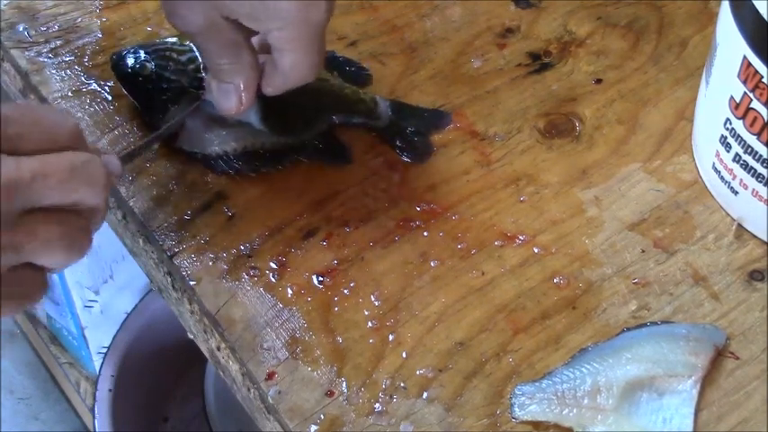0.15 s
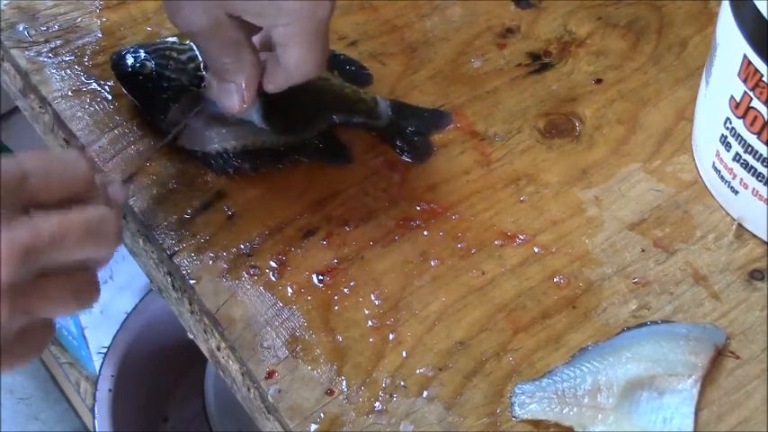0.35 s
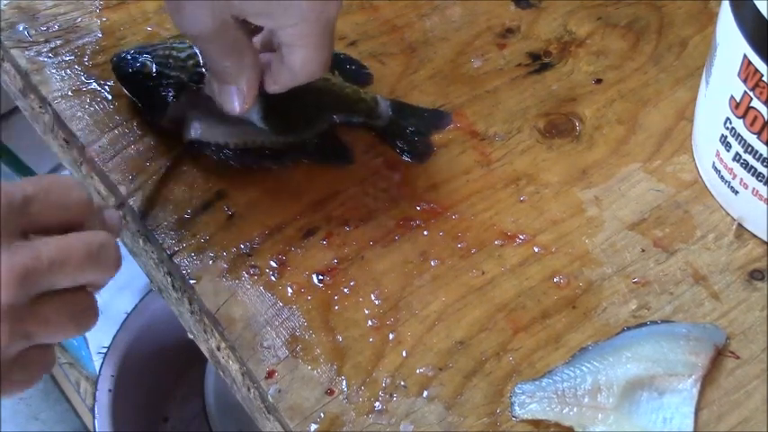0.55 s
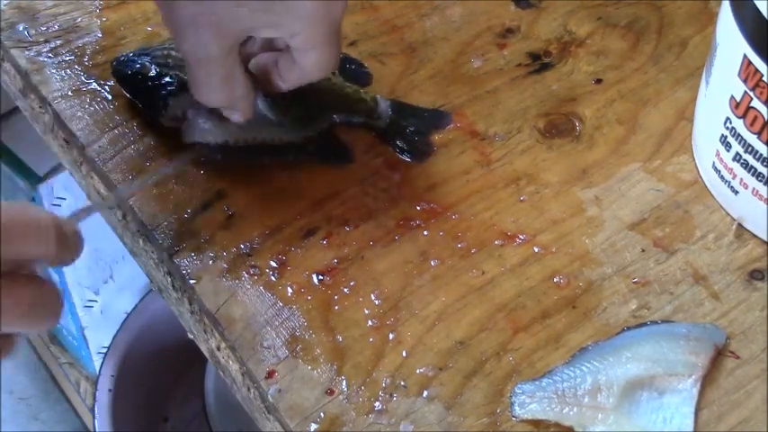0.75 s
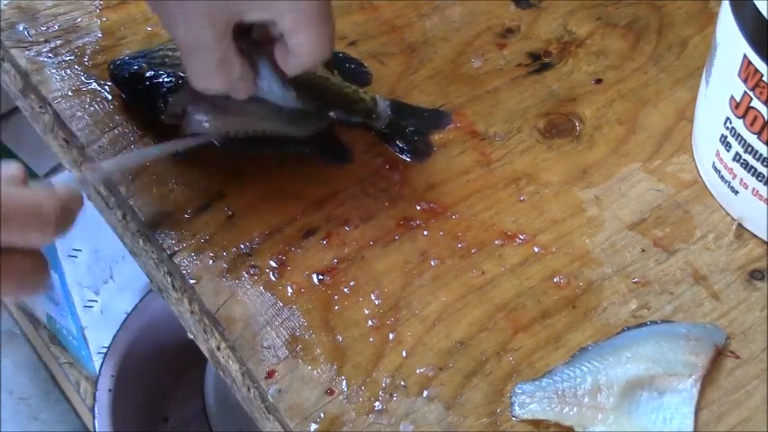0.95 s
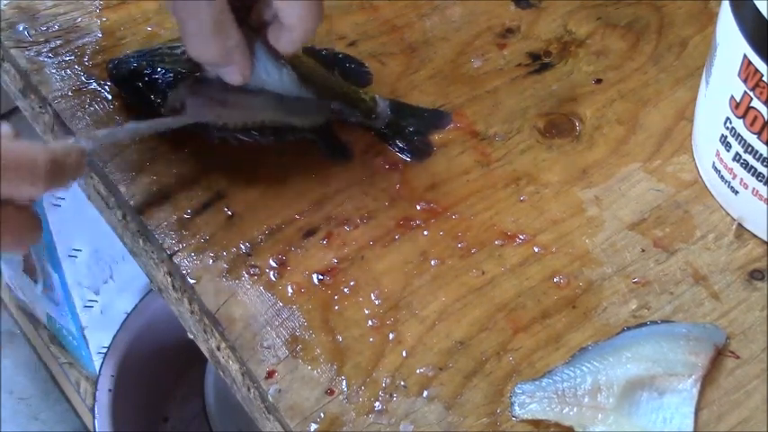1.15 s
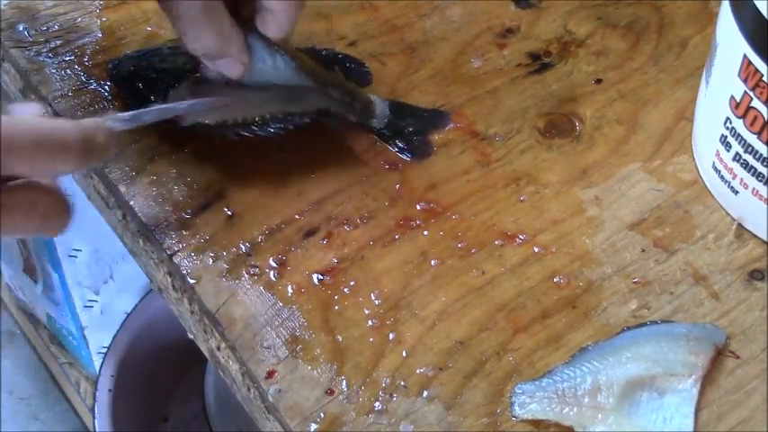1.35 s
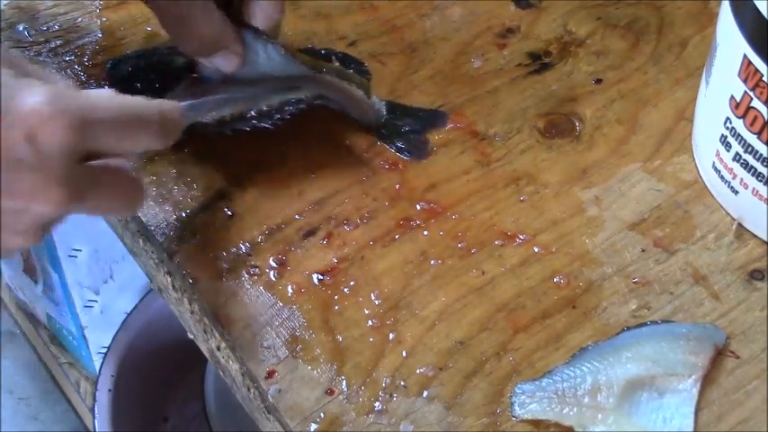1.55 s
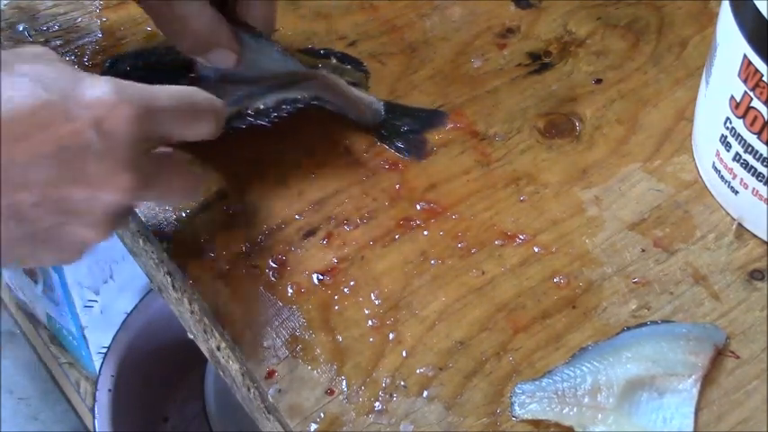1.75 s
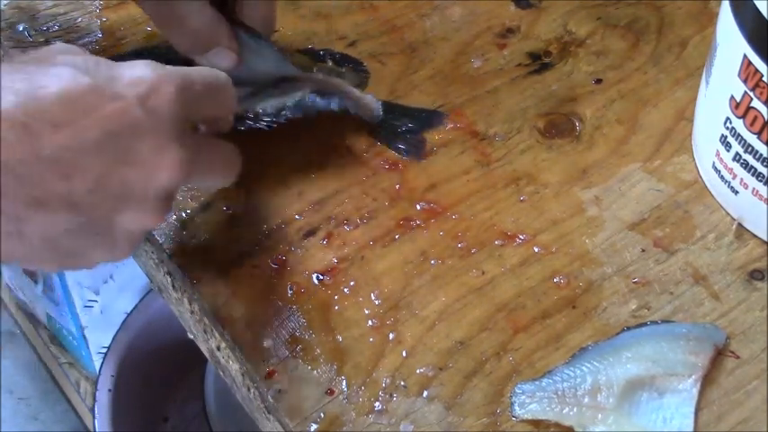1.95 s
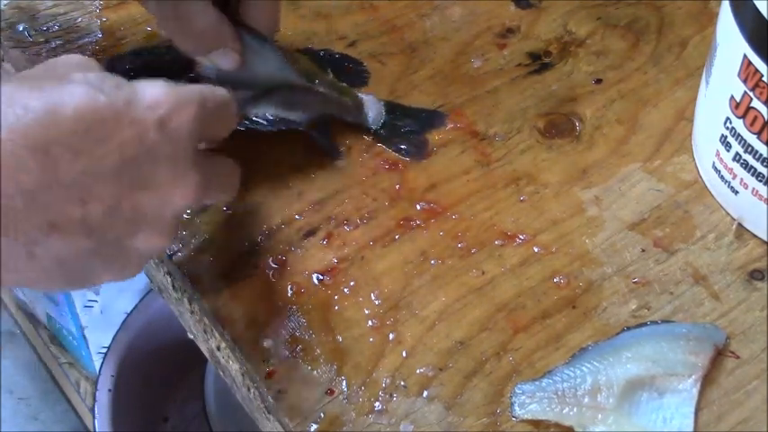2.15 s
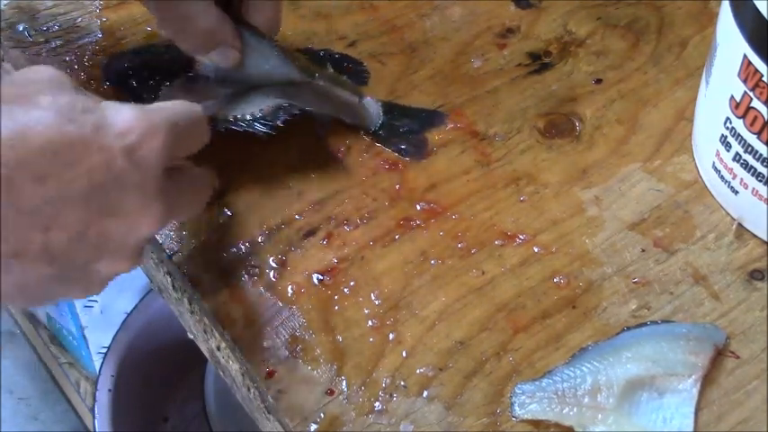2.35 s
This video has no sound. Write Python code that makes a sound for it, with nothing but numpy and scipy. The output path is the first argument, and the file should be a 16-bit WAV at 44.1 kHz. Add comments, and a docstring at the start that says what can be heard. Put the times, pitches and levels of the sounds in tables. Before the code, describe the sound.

A knife fillets a small fish on a wet wooden board, with one sharp knock and wet clicks

```python
"""A knife fillets a small fish on a wet wooden board, heard close by in a quiet room with a faint hum.
The blade's touch, blow and bounces excite damped modes of wood and steel; the board thuds on its support.
Flesh drags and rasps as resonance-filtered noise; clicks, pops and crackle are short filtered impulses.
A squeak, a hollow sliding hiss and a faint, thin high tone join in; hits and clicks feed a short reverberation."""
import sys
import numpy as np
from scipy import signal
from scipy.fft import rfft, irfft
from scipy.io import wavfile
from scipy.ndimage import uniform_filter1d

SR = 44100
rng = np.random.default_rng(int(sys.argv[2]) if len(sys.argv) > 2 else 0)


def bounce(signal):
    """Save signal as a 16-bit WAV file at the path given by the first command-line argument."""
    frames = np.transpose(np.atleast_2d(signal))
    limited = np.clip(frames, -1, 1)
    pcm = np.round(limited * 32767).astype(np.int16)
    wavfile.write(sys.argv[1], SR, pcm)


N = 105840
TIME = np.arange(N) / SR
RING_TIME = np.arange(SR // 2) / SR

# hands and fish rubbing on the board: (time [s], rumble level [dB], hiss level [dB], fizz level [dB])
DRAG_LEVELS = [(0.0, -87, -89, -66), (0.26, -53, -72, -87), (0.39, -52.5, -59.5, -64.5),
               (0.52, -49, -55.5, -71), (0.58, -52.5, -58.5, -65.5), (0.88, -56.5, -64.5, -68),
               (1.02, -58, -71.5, -69.5), (1.16, -67.5, -101, -68.5), (1.35, -57.5, -72.5, -72),
               (1.48, -96, -87, -84), (1.69, -61, -69.5, -78), (1.94, -60, -65, -71),
               (2.09, -57.5, -66.5, -67.5), (2.27, -66, -67, -66), (2.4, -61.5, -76, -80)]
# blade against the board, a touch, the blow and its bounces; wood and steel levels are trimmed in blows():
# (time [s], wood level [dB], steel level [dB], snap pitch [Hz], snap level [dB])
BLADE_BLOWS = [(0.3886, -26, -18.5, 1870, -21.5), (0.3959, -24.5, -4, 6480, -22),
               (0.3977, -9.5, -13.5, 3160, -12.5), (0.4035, -18, -45, 3340, -25.5),
               (.418, -29, -63, 3470, -32), (0.455, -40, -52, 2930, -49), (0.488, -46, -35, 3000, -50)]
WOOD_RISE_S = 0.00071


def amp(db):
    """Level to amplitude: 20 dB is a factor of ten."""
    return 10 ** (np.asarray(db) / 20)


def evened(x):
    """Normalisation to unit rms."""
    return x / np.sqrt(np.mean(x ** 2) + 1e-20)


def read(points, hz):
    """Interpolation of a spectral table along logarithmic frequency."""
    f, value = np.transpose(points)
    return np.interp(np.log(hz + 1), np.log(f + 1), value)


def curve(table, col):
    """Amplitude envelope, linear in dB between the table's times."""
    rows = np.array(table)
    return amp(np.interp(TIME, rows[:, 0], rows[:, col]))


def within(table):
    """Gate open between the table's first and last times."""
    return (TIME > table[0][0]) * (TIME < table[-1][0])


def add(mix, s, sound):
    """Superposition of a sound onto the mix from time s, cut at the end."""
    part = mix[..., round(s * SR):][..., :sound.shape[-1]]
    part += sound[..., :part.shape[-1]]


def pair(same, length=N):
    """Partly correlated noise: the second channel mixes the first with independent noise."""
    a, b = rng.standard_normal((2, length))
    same = np.clip(same, 0, 1)
    return np.array([a, same * a + np.sqrt(1 - same ** 2) * b])


def wobble(seconds, size):
    """Low-pass random fluctuation of unit rms, from two running means."""
    span = max(round(seconds * SR), 2)
    once = uniform_filter1d(rng.standard_normal(size), span)
    return evened(uniform_filter1d(once, span))


def resonate(x, hz, width):
    """Resonance of about unit gain: shift to 0 Hz, two equal one-pole low-passes, shift back."""
    turn = np.exp(2j * np.pi * hz * np.arange(x.shape[-1]) / SR)
    r = np.exp(-np.pi * width / SR)
    low = signal.lfilter([(1 - r) ** 2], [1, -2 * r, r * r], x / turn)
    return 2 * (turn * low).real


def resonances(x, bands):
    """Parallel resonances, each brought to its own rms level."""
    return sum(amp(db) * evened(resonate(x, hz, width)) for hz, width, db in bands)


def ring(modes, rise_s):
    """Modal vibration of a struck body: exponentially damped sines behind a smooth onset."""
    t = RING_TIME
    tones = sum(amp(db - 60 * t / t60) * np.sin(2 * np.pi * hz * t) for hz, db, t60 in modes)
    return (1 - np.exp(-t / rise_s)) * tones


def chatter():
    """Amplitude modulation of a loose board: steady at first, uneven within 7 ms."""
    depth, change_s = 0.35, 0.006
    onset = np.minimum(RING_TIME / 0.0069, 1)
    return 1 + depth * onset * wobble(change_s, size=len(RING_TIME))


def puff(seconds, same):
    """Impulsive contact: a sharp edge and exponentially dying noise, unit energy per channel."""
    x = pair(same, 600) * np.exp(-np.arange(600) / SR / seconds)
    x[:, 0] = 0.75 * np.sqrt(seconds * SR)  # sharp edge
    return x / np.linalg.norm(x, axis=1)[:, None]


def burst(hz, seconds, width, same):
    """Resonant response to an impulsive contact, unit peak; width is a fraction of the pitch."""
    narrow = resonate(puff(seconds, same), hz, width * hz)
    x = resonate(narrow, hz, 2 * width * hz)
    return x / abs(x).max()


def click_burst(hz):
    """Brief broadband impulse around a pitch, unit peak."""
    return burst(hz, 0.00023, 1, 0.68)


def room(x):
    """Reverberation: convolution with dense reflections whose decay time depends on frequency."""
    # (frequency [Hz], t60 [s])
    decay_times = [(130, 0.06), (260, 0.26), (700, 0.31), (1840, 0.2), (4850, 0.17), (12800, 0.078)]
    delayed = np.arange(SR // 2) > 150  # samples before the first reflection
    taps = pair(0.95, SR // 2) * delayed
    hz, t, z = signal.stft(taps, SR, nperseg=256)
    decay = amp(-60 * t / read(decay_times, hz)[:, None])
    tail = signal.istft(z * decay, SR, nperseg=256)[1]
    return signal.fftconvolve(x * np.ones((2, 1)), tail / np.linalg.norm(tail[0]), axes=1)[:, :N]


def air():
    """Stationary noise of room and microphone, with frequency-dependent correlation of the channels."""
    # noise spectrum: (frequency [Hz], relative spectral level [dB])
    air_spectrum = [(25, -4), (60, -7.5), (100, -7), (240, -7.5), (400, -11.5), (700, -17), (2500, -27),
                    (6000, -33.5), (12200, -39), (16500, -45)]
    # left-right likeness: (frequency [Hz], correlation [-1 to 1])
    likeness = [(60, -0.21), (240, -0.081), (950, -0.38), (3770, 0.13), (15000, 0.25)]
    level_db = -56.5  # rms
    hz, (a, b) = np.fft.rfftfreq(N, 1 / SR), rfft(rng.standard_normal((2, N)))
    same = np.clip(read(likeness, hz), -1, 1)
    stereo = np.array([a, same * a + np.sqrt(1 - same ** 2) * b])
    return amp(level_db) * evened(irfft(stereo * amp(read(air_spectrum, hz)), N))


def hum():
    """Steady tones: sines of constant amplitude and random starting phase."""
    # (frequency [Hz], level [dB] before a 1.5 dB lift)
    hum_tones = [(89, -79), (240, -63)]
    return sum(amp(db + 1.5) * np.sin(2 * np.pi * (hz * TIME + rng.random())) for hz, db in hum_tones)


def rattle():
    """Noise-excited resonances of loose things, decaying exponentially after the main blow."""
    # (frequency [Hz], width [Hz], relative level [dB])
    rattle_bands = [(616, 830, -0.5), (1240, 1600, -1), (3230, 340, -22.5), (5400, 1300, -4),
                    (11060, 2000, -22)]
    level_db, t60_s = -31.5, 0.22
    t = TIME - BLADE_BLOWS[2][0]
    noise = evened(resonances(pair(0.94), rattle_bands))
    return noise * (t > 0) * amp(level_db - 60 * np.maximum(t, 0) / t60_s)


def nudges():
    """Low tones under half-sine envelopes: soft swells as the hands press the board."""
    # (time [s], peak level [dB], pitch [Hz], length [s])
    nudge_events = [(.725, -53, 281.4, 0.046), (0.952, -51.5, 284, 0.049), (1.073, -46, 297, 0.033),
                    (1.107, -53, 259, 0.034), (1.2, -51.5, 271, 0.049), (1.963, -49, 298, 0.04)]
    out = np.zeros((2, N))
    for s, db, hz, length in nudge_events:
        t = np.arange(0, length, 1 / SR)
        tone = np.sin(2 * np.pi * (hz * t + rng.random()))
        swell = np.sin(np.pi * t / length)
        add(out, s, amp(db) * (swell * tone)[None])
    return out


def drag():
    """Friction noise through resonances: lumpy low rumble of the board, hiss of wet skin, fizz on top."""
    # board: (frequency [Hz], width [Hz], relative level [dB])
    rumble_bands = [(132, 90, -5.5), (197.4, 19.6, -6.5), (263.8, 43.5, -0.5), (301.6, 21, -0.5),
                    (365.3, 36, -5), (477, 36.5, -8.5), (760, 580, -14.5)]
    # wet skin: (frequency [Hz], width [Hz], relative level [dB])
    hiss_bands = [(995, 660, 8.5), (1384, 62, 2), (1820, 440, -0.5), (2367, 1200, 5.5), (3050, 3600, 7)]
    lumps = amp(2.5 * wobble(500 / SR, size=N))  # 2.5 dB rms
    rumble = resonances(pair(0.73) * lumps, rumble_bands)
    hiss = resonances(pair(0.46), hiss_bands)
    fizz = resonate(pair(0.12), 8250, 18000)
    layers = [rumble, hiss, fizz]
    return sum(evened(x) * curve(DRAG_LEVELS, k + 1) for k, x in enumerate(layers))


def slide():
    """Narrow-band noise from one resonance: the hollow hiss as the fish slides."""
    # (time [s], level [dB])
    slide_levels = [(0.45, -54), (0.518, -74), (0.698, -68), (0.71, -62), (0.768, -74.5), (1.05, -74)]
    hiss = evened(resonate(pair(0.86), 2560, 250))
    return hiss * curve(slide_levels, 1) * within(slide_levels)


def thin_band():
    """Very narrow-band noise near 5.5 kHz, switched on and off: a faint, thin high tone."""
    # (time [s], length [s], level [dB])
    thin_band_events = [(0.054, 0.09, -76), (0.212, 0.067, -73), (.5, 0.29, -77), (.82, 0.068, -73),
                        (0.945, 0.063, -74.5)]
    gate = sum(amp(db) * (TIME > s) * (TIME < s + length) for s, length, db in thin_band_events)
    tone = evened(resonate(pair(0.44), 5500, 30))
    return tone * uniform_filter1d(gate, 300)


def squeak():
    """Frequency-wandering tone amid narrow-band noise: a rough squeak with a wider skirt."""
    # (time [s], level [dB])
    squeak_levels = [(2.02, -83), (2.042, -80), (2.072, -61), (2.094, -74), (2.17, -74), (2.2, -61),
                     (2.224, -69), (2.248, -54), (2.285, -83), (2.332, -69), (2.37, -81)]
    pitch_hz, wander_hz = 4270, 50
    rub = pair(0.92)
    phase = 2 * np.pi * np.cumsum(pitch_hz + wander_hz * wobble(0.023, size=N)) / SR
    line = amp(-4) * np.sqrt(2) * np.sin(phase)
    core = evened(resonate(rub, pitch_hz, 150))
    skirt = amp(2) * evened(resonate(rub, pitch_hz, 800))
    return evened(core + skirt + line) * curve(squeak_levels, 1) * within(squeak_levels)


def rasps():
    """Amplitude-modulated friction noise: grainy rasps of the blade through flesh, swelling fast."""
    # (time [s], length [s], level [dB], pitch [Hz])
    rasp_events = [(0.344, 0.02, -52.5, 2000), (.345, 0.027, -53.5, 10100), (1.106, 0.039, -59, 3120),
                   (1.682, 0.042, -64, 1870), (1.804, 0.0074, -60, 1000), (1.818, 0.031, -67, 3650),
                   (1.904, 0.19, -73, 3520), (1.966, 0.059, -58.5, 1190), (2.05, 0.12, -63.5, 3030),
                   (2.193, 0.037, -63, 2180), (2.23, 0.035, -60, 1660)]
    out = np.zeros((2, N))
    grains = pair(0.84) * amp(1.5 * wobble(60 / SR, size=N))  # 1.5 dB rms
    for s, length, db, hz in rasp_events:
        u = np.arange(0, 1, 1 / (length * SR))
        piece = grains[:, round(s * SR):][:, :len(u)]
        swell = np.sin(np.pi * np.sqrt(u))
        add(out, s, amp(db) * swell * evened(resonate(piece, hz, hz)))
    return out


def crackle():
    """Random impulse train whose density follows the fizz of the drag: faint crackle in four pitches."""
    mean_per_s, level_db = 110, -58.5
    fizz = curve(DRAG_LEVELS, 3)
    busy = fizz / fizz.mean()
    size = amp(3.8 * np.minimum(rng.exponential(1, (4, N)), 3))
    train = (rng.random((4, N)) < mean_per_s / 4 / SR * busy) * size
    out = np.zeros((2, N))
    for row, hz in zip(train, (3380, 7000, 9630, 11840)):
        out += amp(level_db) * signal.oaconvolve(row[None], click_burst(hz), axes=1)[:, :N]
    return out


def pops():
    """Impulses through narrower resonances, alike in both channels: duller pops."""
    # (time [s], peak level [dB], pitch [Hz])
    pop_events = [(0.347, -55, 800), (1.105, -55, 3160), (1.295, -49.5, 4030), (1.801, -48.5, 2550),
                  (1.972, -56.5, 1150), (1.983, -52, 810), (2.064, -52, 2980), (2.196, -59, 1830), ]
    out = np.zeros((2, N))
    for s, db, hz in pop_events:
        add(out, s, amp(db) * burst(hz, 0.0027, 0.27, 1.0))
    return out


def clicks():
    """Sudden release of scales, bones and skin: a bright impulse, lower part, wide edge and wet after-sound."""
    # (time [s], bright part level [dB], pitch [Hz], low part level [dB] before a 1.5 dB cut,
    #  left minus right [dB])
    click_events = [(0.056, -49.5, 8400, -73, 1.0), (0.0686, -53, 6100, -81, 0.5),
                    (0.1621, -45.5, 9000, -61, 4), (0.3476, -35, 10360, -48, 3),
                    (0.6724, -54.5, 8900, -67, 7), (0.6794, -58, 5600, -68, 6), (0.708, -49, 9800, -51, 10),
                    (0.7259, -47, 10900, -61, 0), (0.753, -48, 8600, -66, 7), (0.7936, -51.5, 8700, -64, 5),
                    (0.907, -43, 12200, -45.5, 1.0), (0.9367, -57, 7100, -58, 0.5),
                    (0.947, -49.5, 9800, -63, 4), (0.955, -56, 5630, -55, -1), (0.9875, -54, 6900, -55, 6),
                    (0.996, -52, 6900, -51, 1), (1.0568, -56, 6200, -44, -2), (1.061, -52, 6650, -44.5, 3),
                    (1.0699, -49, 10600, -61, 3), (1.0824, -55, 5900, -68, 0.5),
                    (1.092, -47, 11800, -70, 0), (1.1118, -46.5, 7250, -49, 0),
                    (1.1188, -38.5, 10500, -46, 3), (1.1594, -45, 7450, -56, 1.5),
                    (1.1835, -42.5, 10800, -74, 4), (1.1983, -30.5, 11000, -34.5, 0),
                    (1.2245, -43.5, 11700, -77, 0), (1.3483, -50, 8500, -63, 5),
                    (1.6494, -52, 9900, -53, 4), (1.8032, -34, 10730, -46.5, 3.0),
                    (1.9345, -47.5, 5950, -52, 1), (1.9843, -38, 11900, -42.5, 0),
                    (1.998, -46.5, 9500, -63, 3), (2.067, -47, 7700, -60, -2),
                    (2.0764, -35.5, 9270, -57, 2), (2.196, -44, 10300, -55.5, 1.0),
                    (2.2323, -46, 10400, -69, 3), (2.243, -48.5, 7100, -56, -0.5), ]
    out = np.zeros((2, N))
    for s, db, hz, low_db, pan_db in click_events:
        bright = amp(db) * click_burst(hz)
        low = amp(low_db - 1.5) * burst(3830, 0.00037, 0.61, 0.76)
        edge = amp(db + 1.5) * burst(7040, 0.000115, 1.78, 0.88)
        after = amp(db - 3.5) * burst(hz, 0.0064, 0.35, 0.58)
        add(out, s, (bright + low + edge + after) * amp([[pan_db / 2], [-pan_db / 2]]))
    return out


def thuds():
    """Damped modes of the board rocking on its support; the hands stop the low ring early."""
    # (time [s], level [dB], brightness relative to it [dB], low ring before stopping [s])
    thud_events = [(0.214, -33, -7, 0.028), (0.247, -43, -18, 0.022), (0.281, -41.5, -18, 0.012),
                   (0.298, -38.5, -24, 0.03), (.345, -35.5, -18, 0.03), (.395, -36.5, -29, 0.018),
                   (0.452, -37.5, -24, 0.017)]
    # low modes on the support: (frequency [Hz], relative level [dB], t60 [s])
    support_modes = [(56.8, -11.5, .3), (134.6, 4, 0.17), (181, -10, 0.7)]
    # upper modes: (frequency [Hz], relative level [dB], t60 [s])
    top_modes = [(328, -3.5, 0.206), (457, 1.5, 0.066), (515.3, -2, 0.26), (625, -5.5, 0.15),
                 (793, -3.5, 0.077), (862, 5, 0.022), (1148, -6.5, 0.082)]
    out = np.zeros((2, N))
    for s, db, top_db, length in thud_events:
        stop = np.exp(-np.maximum(RING_TIME - length, 0) / 0.005)
        low = stop * ring(support_modes, 0.0015)
        top = amp(top_db) * chatter() * ring(top_modes, WOOD_RISE_S)
        add(out, s, amp(db) * (low + top)[None])
        add(out, s, amp(db + top_db - 6.5) * burst(1500, 0.0031, 0.94, 0.78))
    return out


def blows():
    """Impact excites modes of wood and steel; a rough contact is the force that shakes the steel."""
    # board: (frequency [Hz], relative level [dB], t60 [s])
    wood_modes = [(311.3, -1.5, 0.095), (312, -5.5, .1), (411.5, -11, 0.15), (450.2, -8.5, 0.21),
                  (534, -11.5, 0.074), (611, 3, 0.067), (654.4, -8, 0.23), (686.4, -12.5, .12),
                  (578, -22, 0.084), (770, 1.5, 0.03), (967, -15.5, 0.11), (1152, -2, 0.025),
                  (1372, -11.5, 0.059), (2105, -16, 0.067)]
    # blade: (frequency [Hz], relative level [dB], t60 [s])
    steel_modes = [(3250, -4, .012), (3520, 0, .014), (3850, -8, .012), (4620, -8, .014), (5100, -13, .012),
                   (5430, -14, .01), (6700, -14, .01), (7320, -10, .01), (11000, -16, .008)]
    wood_trim_db, steel_trim_db = -9.5, -6
    out = np.zeros((2, N))
    for s, wood_db, steel_db, hz, db in BLADE_BLOWS:
        wood = chatter() * ring(wood_modes, WOOD_RISE_S)
        steel = signal.fftconvolve(ring(steel_modes, 0.00037)[None], puff(0.0026, 0.94), axes=1)
        snap = burst(hz, 0.0016, 0.39, 0.56)
        crack = burst(9000, 0.0061, 4.57, 0.45) * amp([[1.5], [-1.5]])  # wide-band, leaning left
        add(out, s, amp(wood_db + wood_trim_db) * wood[None])
        add(out, s, amp(steel_db + steel_trim_db) * steel)
        add(out, s, amp(db) * snap)
        add(out, s, amp(db - 0.5) * crack)
    return out


def scene():
    """Superposition of all sources; only hits, clicks, pops and crackle feed the reverberation."""
    hits = thuds() + blows()
    snaps = clicks() + pops() + crackle()
    wet = room(amp(-9) * hits + amp(-13) * snaps)
    background = air() + hum() + rattle() + nudges()
    rubbing = drag() + slide() + thin_band() + squeak() + rasps()
    return background + rubbing + snaps + hits + wet


def record(dry):
    """Band-pass response of a small microphone (67.4 Hz to 13.6 kHz), then a steep low-pass at 16.65 kHz."""
    band = signal.butter(2, [67.4, 13600], "band", fs=SR, output="sos")
    thin = signal.sosfilt(band, dry)
    edge = signal.firwin(511, 16650, window=("kaiser", 9), fs=SR)
    return signal.oaconvolve(thin, edge[None], "same")


dry = scene()
out = record(dry)
bounce(out)
```